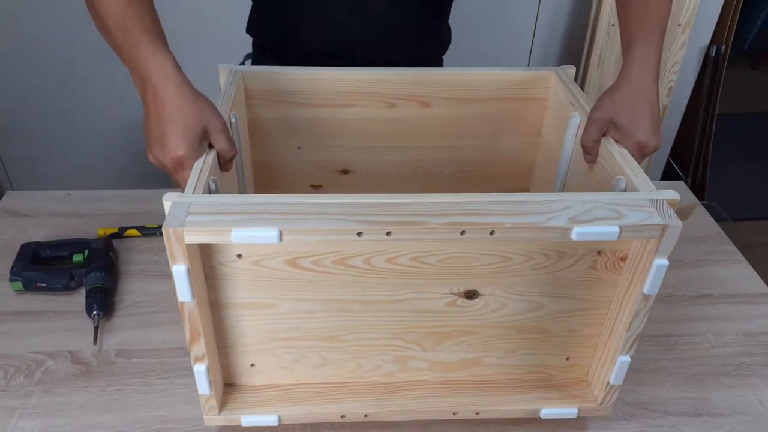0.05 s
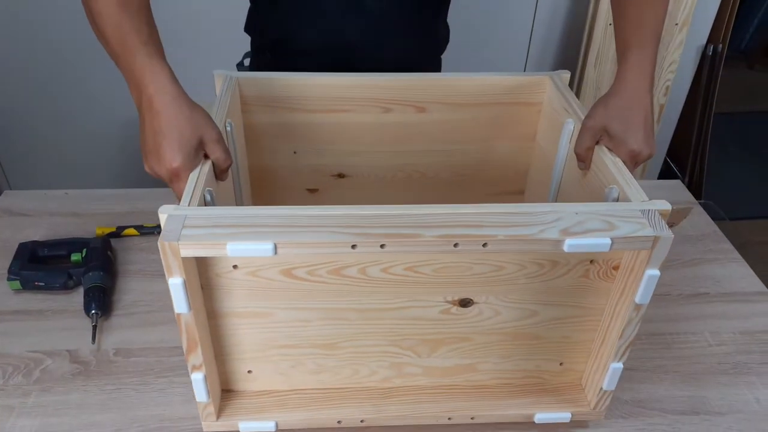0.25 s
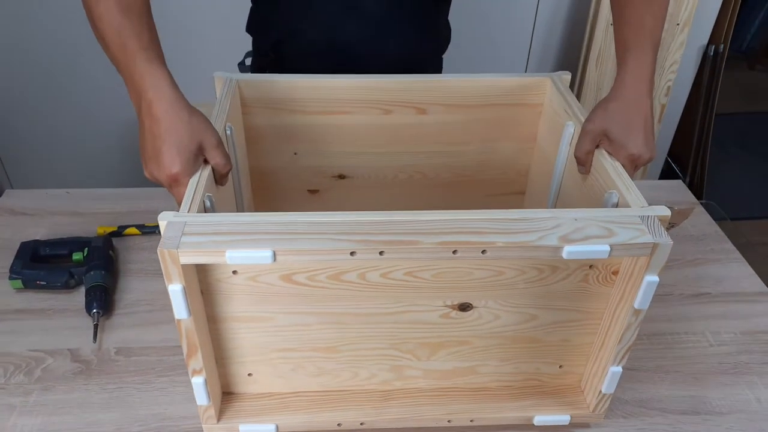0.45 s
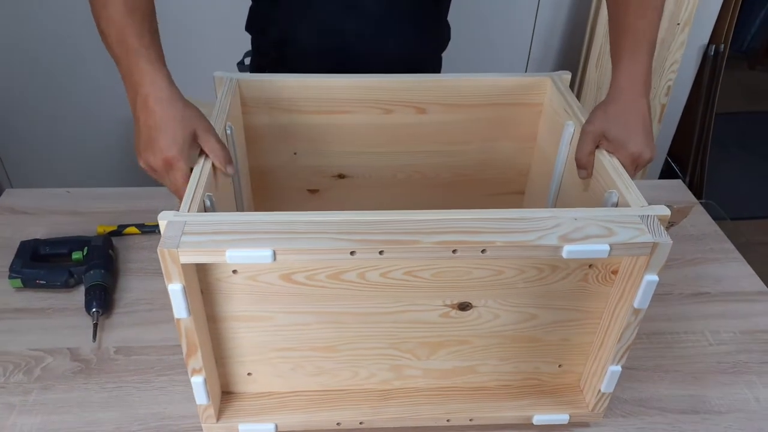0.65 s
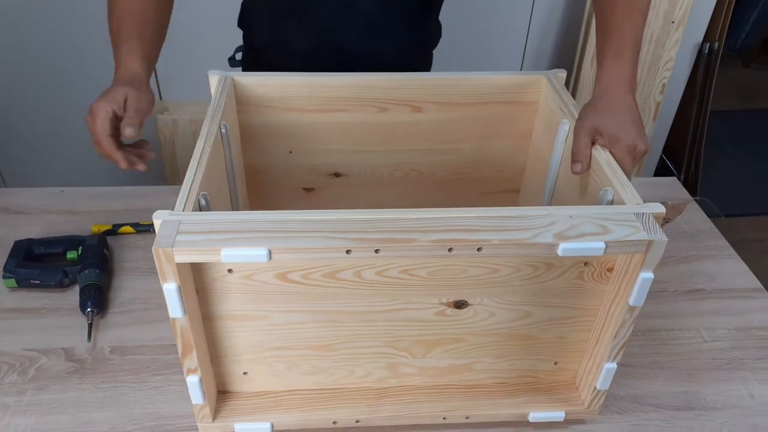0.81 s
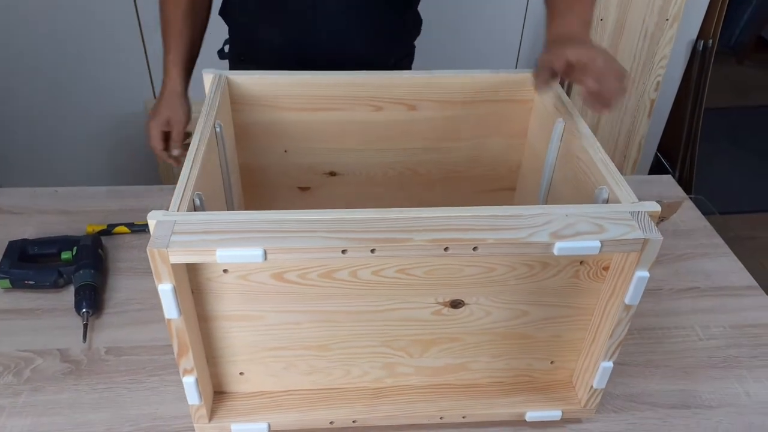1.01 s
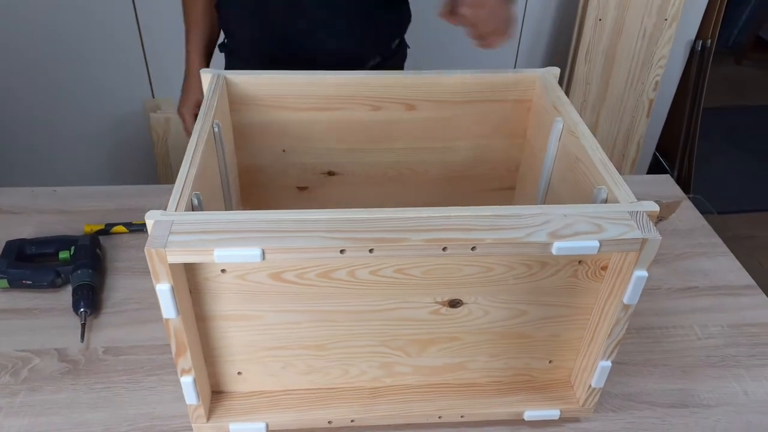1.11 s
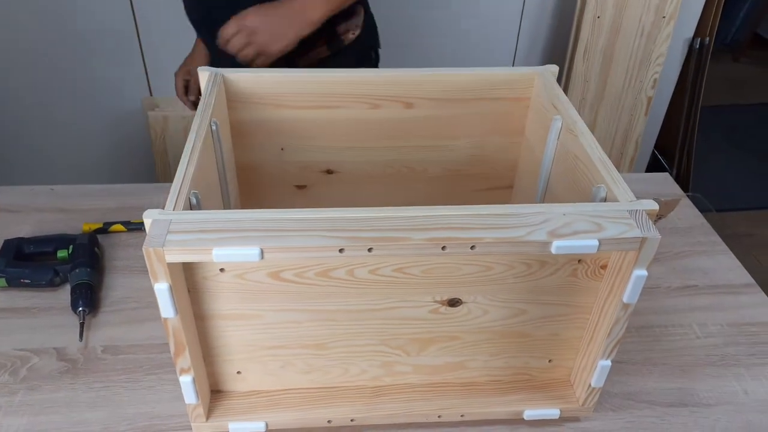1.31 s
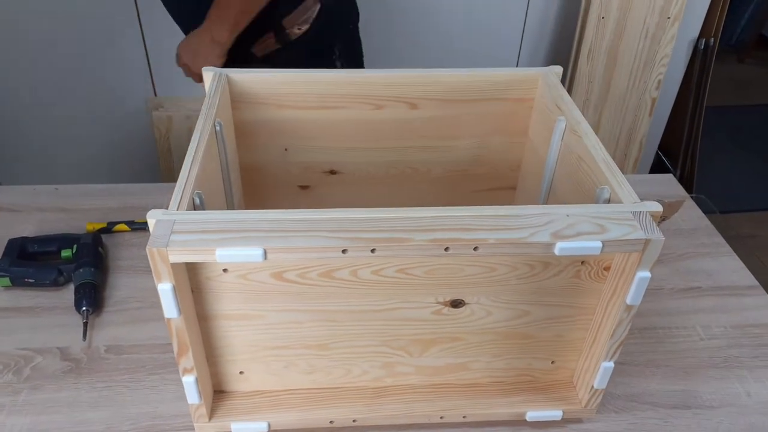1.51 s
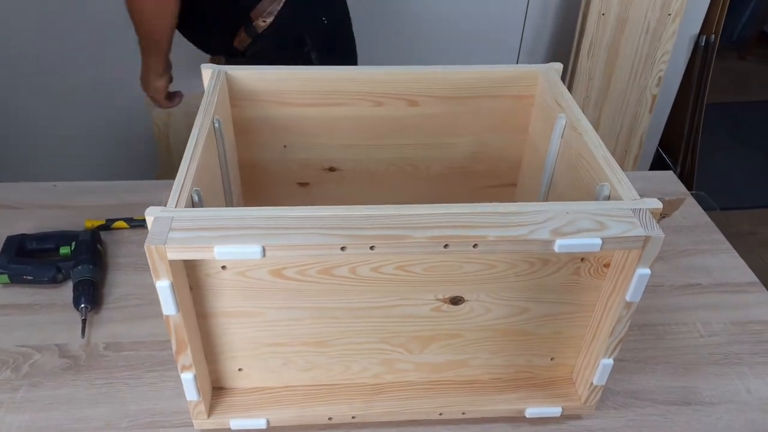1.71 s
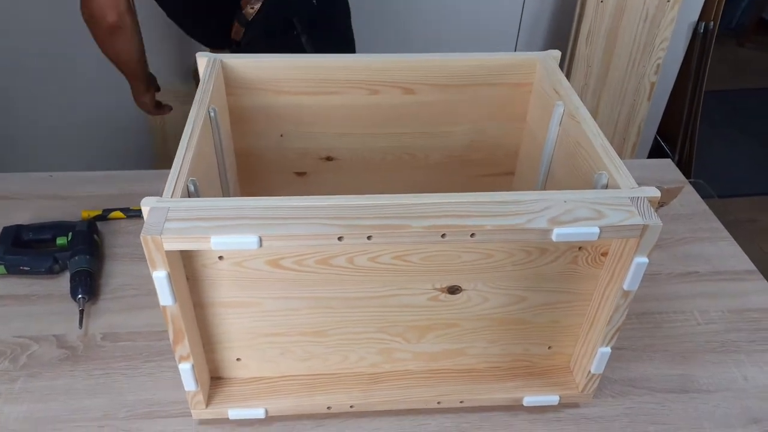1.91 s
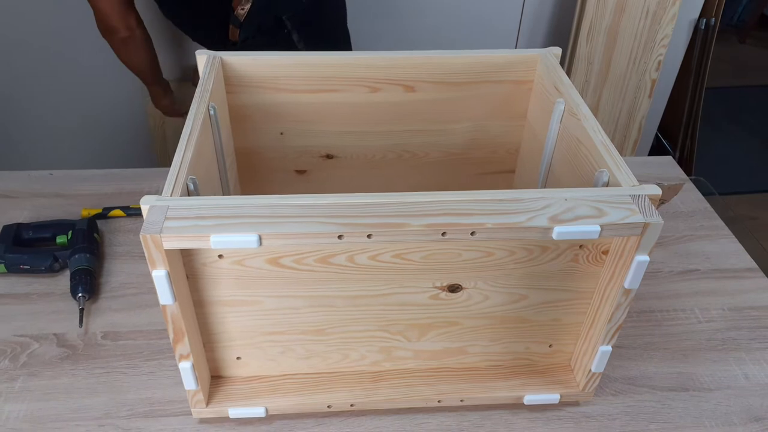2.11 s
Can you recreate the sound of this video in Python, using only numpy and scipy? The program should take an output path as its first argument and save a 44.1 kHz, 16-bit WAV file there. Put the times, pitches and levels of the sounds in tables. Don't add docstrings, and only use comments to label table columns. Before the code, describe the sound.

A hollow wooden box frame is set down on a table: after near silence, a first knock at 0.2 s, then the loudest deep boom near 0.4 s with rapid rocking thuds and dry board rattles, choked by 0.65 s. Hands slide faintly off the wood until 1.1 s; clothes swish around 1.5-1.7 s, and a soft, dull step shakes the floor near 1.85-2 s. Quiet workshop air, close stereo.

```python
import sys
import numpy as np
from scipy import signal
from scipy.fft import rfft, irfft, next_fast_len
from scipy.io import wavfile
from scipy.ndimage import uniform_filter1d

SR = 44100
rng = np.random.default_rng(int(sys.argv[2]) if len(sys.argv) > 2 else 0)


def makeup_ratio(level_db):
    decades = np.asarray(level_db, float) / 20
    return 10 ** decades


def bounce(signal):
    frames = np.transpose(np.atleast_2d(signal))
    limited = np.clip(frames, -1, 1)
    pcm = np.round(limited * 32767).astype(np.int16)
    wavfile.write(sys.argv[1], SR, pcm)


N = 94815

# t/s, boom level/dB, hollow level/dB, knock level/dB, tick level/dB
CONTACTS = [(0.183, -53, -43.5, -74, -75), (0.2, -54.5, -30, -50, -64), (0.217, -18, -11.5, -34, -70),
            (0.241, -49, -38.5, -37.5, -80.5), (0.279, -17, -18.5, -39.5, -71),
            (0.306, -26.5, -24.5, -38.5, -71), (.375, -5.5, -5, -30, -68.5), (.404, -14, -27, -38.5, -64),
            (0.426, -34.5, -30.5, -39.5, -69.5), (.458, -15, -12, -45, -62.5),
            (0.484, -12, -37.5, -40, -62.5), (0.506, -13.5, -26.5, -44, -53),
            (0.534, -32, -21.5, -54.5, -67), (0.572, -42, -43, -49.5, -60),
            (0.608, -29.5, -28.5, -46.5, -49.5), (0.653, -48, -41, -70, -58),
            (0.711, -43, -40.5, -70, -79.5), (.451, -47, -21, -41.5, -60), (.26, -43.5, -36.5, -40, -73)]
# f/Hz, level on edge/dB, level lying flat/dB, t60/s
BOOM_MODES = [(72.4, -32, -33, 0.4), (95, -30, -26, 0.27), (125, -4.5, 0.5, 0.074), (167.6, -0.5, -6, 0.38),
              (205.2, -4.5, -3.5, 0.36)]
# f/Hz, level on edge/dB, level lying flat/dB, t60/s
HOLLOW_MODES = [(250, -7, -21, 0.25), (284.73, -21.5, 0, 0.46), (313.7, -2, -3.5, 0.3),
                (328.7, -1.5, -0.5, 0.2), (383, -13.5, -9, 0.19), (432.7, -27, -24, 0.25)]
# f/Hz, level/dB, t60/s
KNOCK_MODES = [(537.3, 2.5, 0.16), (619, -1.5, 0.067), (682, -0.5, 0.056), (757.6, -4.5, 0.16),
               (847.4, -6, 0.14), (928, -5, .07), (1028, -6.5, 0.07), (1125, -4.5, .06), (1230, -6.5, 0.06),
               (1432, -9.5, 0.06), (1534, -10.5, .06), (1617, -13, .07), (1868, -16.5, 0.12),
               (2186, -19, .04)]
# f/Hz, level/dB
TICK_COLOUR = [(900, -10), (2000, 11), (6500, 0.5), (9000, 0), (15000, -4.5)]
# f/Hz, level/dB
CLATTER_COLOUR = [(900, -4.5), (2200, -1), (4200, -7), (8000, -30.5)]
# t/s, level/dB, f/Hz, t60/s
RATTLES = [(.195, -51.5, 1160, 0.1), (.198, -53, 800, .06), (.205, -60, 2350, 0.069),
           (.219, -39, 1230, 0.066), (.219, -36, 950, 0.052), (.245, -35, 619, 0.18),
           (.278, -49, 1650, .04), (.3, -40.5, 640, 0.21), (.303, -56, 1600, 0.1),
           (.376, -28.5, 1100, 0.03), (.376, -37, 1480, 0.064), (.375, -46, 2100, 0.099),
           (.375, -48, 2450, 0.05), (.375, -47.5, 3500, 0.041), (.401, -33.5, 985, 0.055),
           (.405, -43, 2300, .04), (.42, -41.5, 1200, .04), (.451, -41.5, 1250, 0.035),
           (.452, -48, 2900, .04), (.456, -40, 1400, 0.022), (.478, -44, 3600, 0.024),
           (.484, -39.5, 2086, .025), (.483, -40, 980, 0.061), (.484, -45, 1300, .04),
           (.485, -43.5, 1650, 0.033), (.497, -42, 1000, 0.036), (.53, -42.5, 650, .06),
           (.608, -46.5, 830, 0.073), (.608, -51.5, 1100, 0.057)]
# t/s, length/s, level/dB, f/Hz
THROBS = [(0.599, 0.15, -51, 419.5), (.21, 0.14, -28, 124.8), (.27, 0.073, -34.5, 189.6),
          (.31, 0.075, -29, 323.6), (.372, 0.061, -8.5, 121.1), (.43, 0.045, -18, 287.8),
          (.455, 0.059, -15, 121.6), (.5, 0.08, -21, 172.4), (.515, 0.099, -26.5, 122.6),
          (.54, 0.16, -55, 70.7), (.59, 0.11, -41, 125), (.6, 0.085, -35, 170), (.62, 0.058, -41.5, 304.5),
          (.69, .065, -49, 302), (.705, 0.026, -47, 128), (.745, 0.035, -49, 133), (.76, 0.055, -63, 318)]
# t/s, level/dB
HAND_LEVELS = [
    [(0, -79), (.05, -83), (.08, -106), (.17, -112)],
    [(.175, -77), (.206, -63.5), (.36, -78.5), (.38, -62.5), (.56, -72.5), (.67, -61), (.80, -86),
     (.895, -82), (1.1, -91.5)],
]
# f/Hz, level/dB
SKIN_COLOUR = [(300, 11), (900, 4.5), (2000, 3), (4000, -2), (8000, -10.5), (11000, -13), (15500, -17)]
# t/s, level/dB, sole weight/dB, cloth fold/dB
MOVES = [
    [(1.1, -88, -1.5, -21), (1.206, -80, -5, -29), (1.258, -68, -4, 2), (1.396, -71.5, 2.5, -3.5),
     (1.435, -71.5, -11.5, -5.5)],
    [(1.44, -72.5, -16, 0.5), (1.47, -63.5, -13.5, -9), (1.55, -59.5, -12, 2), (1.64, -54, -29, 1.5),
     (1.75, -67.5, -9.5, 2)],
    [(1.75, -63, -6.5, -5), (1.828, -50.5, -1.5, 6), (1.92, -57, 8.5, 5.5), (2.05, -71.5, 8.5, 1),
     (2.082, -82.5, 0.5, 5.5), (2.15, -82, 10.5, -2)],
]
# f/Hz, level/dB
CLOTH_COLOUR = [(400, 6.5), (800, 10), (1350, -9.5), (2200, 1.5), (3900, 5), (5500, -4.5), (8500, -13),
                (15500, -24)]
# f/Hz, level/dB
SOLE_COLOUR = [(60, -4.5), (130, -0.5), (230, 6), (340, 8.5), (450, 6), (720, -4.5), (1100, -18),
               (2000, -52)]
# f/Hz, level/dB
FOLD_COLOUR = [(400, 4), (600, -6.5), (900, 4.5), (1350, 4), (2200, 3), (5000, -32)]
# t/s, level/dB, f/Hz, t60/s
STEPS_AND_RINGS = [(0, -51.5, 231, 0.16), (.005, -56, 321.7, 0.21), (.1, -51, 290, .2), (.80, -55.5, 143, 0.63),
                   (.915, -53.5, 139, 0.24), (.855, -49.5, 310, 0.16), (.9, -52, 333, 0.27), (.945, -56.5, 320, 0.19),
                   (.985, -59.5, 333, 0.077), (1.37, -52, 330, 0.11), (1.775, -53, 60, 0.17), (1.79, -48, 205, 0.37),
                   (1.845, -33, 460, 0.066), (1.83, -39, 717, 0.19), (1.875, -39, 850, 0.13),
                   (1.875, -38.5, 70.3, 0.37), (1.89, -42, 231.1, 0.35), (1.935, -35, 270, 0.13),
                   (1.936, -33, 125, 0.14), (1.967, -42, 125, 0.19), (1.96, -38, 327.4, 0.22),
                   (2.025, -42.5, 250, 0.16), (2.09, -58, 65.5, 0.35), (2.10, -54.5, 310, 0.21),
                   (2.11, -54.5, 380, .15)]
# t/s, length/s, level/dB, f/Hz, width/Hz
SQUEAKS = [(.74, .1, -75.5, 1590, 119), (0.857, .13, -79.5, 1560, 59.7), (.86, .08, -71.5, 3000, 1994),
           (1.08, .14, -82, 1900, 80), (1.14, 0.35, -73, 3900, 500), (1.785, 0.092, -65, 3560, 3480),
           (1.493, 0.24, -51.5, 1400, 350), (1.613, .12, -62, 532, 120)]
# f/Hz, level/dB
AIR_COLOUR = [(18, -25.5), (50, -11.5), (130, -17.5), (225, -15.5), (292, 9), (606, -14.5), (1910, -19.5),
              (2240, -23.5), (15500, -30)]
# f/Hz, width/Hz, level/dB
HUM = [(141, 40, -80), (255, 60, -78.5), (325, 37, -80.5)]

FLAT_START_S, FLAT_END_S = 0.37, 0.56
CHOKE_START_S, CHOKE_DB_PER_S = 0.575, 170
LOOSE_T60_SHARE = 0.75
SCATTER_DB, DETUNE = 7.5, 0.017
LOW_SCATTER, KNOCK_SCATTER = 0.25, 0.64
PUSH_S, KNOCK_PUSH_S, RATTLE_PUSH_S, STEP_PUSH_S = 0.004, 0.00028, 0.0003, 0.013
KNOCK_SIDE_DB = -6.5
TICK_T60_S = 0.03
CLATTER_DB, CLATTER_T60_S = -24.5, 0.063
GRAINS_PER_S, GRAIN_DB, GRAIN_SHARE = 1500, 3, 0.46
FLICKER_DB, FLICKERS_PER_S = 2.02, 24.87
AIR_DB = -73
WAVER_DB, WAVERS_PER_S = 3, 14
ROOM_T60_S, ROOM_DB, ROOM_THIN_HZ, ROOM_DULL_HZ = 0.3, -11, 350, 3000
ALIKE_HZ = 700
LEFT_DB = 1.5
LEFT_LIFT_HZ, LEFT_LIFT_DB = 1500, 2
RIGHT_LIFT_HZ, RIGHT_LIFT_WIDTH_HZ, RIGHT_LIFT_DB = 8100, 2500, 11
NOTCH_HZ, NOTCH_WIDTH_HZ, NOTCH_DB = 10060, 900, -8
LOW_CUT_HZ, RIGHT_LAG_S = 46, 0.0001


def cabinet():
    wood = single(RATTLES, RATTLE_PUSH_S) + throbs() + np.zeros((2, N))
    choked = np.zeros(N)
    noise_env = np.zeros((2, N))
    t = np.arange(SR // 4) / SR
    chance = rng.standard_normal((40, 3, 2, 14))
    for (s, boom_db, hollow_db, knock_db, tick_db), c in zip(CONTACTS, chance):
        level_column = 2 if FLAT_START_S < s < FLAT_END_S else 1
        loose = s > FLAT_END_S
        t60_share = LOOSE_T60_SHARE if loose else 1
        for modes, db in ((BOOM_MODES, boom_db), (HOLLOW_MODES, hollow_db)):
            posed = np.array(modes)[:, [0, level_column, 3]] * [1, 1, t60_share]
            body = makeup_ratio(db) * ring(posed, LOW_SCATTER * c[0], PUSH_S) / 2
            add(wood if loose else choked, s, body)
        mid = ring(KNOCK_MODES, KNOCK_SCATTER * c[2], KNOCK_PUSH_S)
        side = ring(KNOCK_MODES, KNOCK_SCATTER * c[1], KNOCK_PUSH_S)
        add(wood, s, makeup_ratio(knock_db) * spread(mid, makeup_ratio(KNOCK_SIDE_DB) * side) / 2)
        tick_env_db = tick_db - 60 * t / TICK_T60_S
        clatter_env_db = knock_db + CLATTER_DB - 60 * t / CLATTER_T60_S
        add(noise_env, s, makeup_ratio(np.array([tick_env_db, clatter_env_db])))
    choke = makeup_ratio(-CHOKE_DB_PER_S * np.maximum(np.arange(N) / SR - CHOKE_START_S, 0))
    noises = noise_env[0] * hiss(TICK_COLOUR) + noise_env[1] * hiss(CLATTER_COLOUR)
    return wood + choke * choked, noises


def throbs():
    out = np.zeros(N)
    for s, length, db, hz in THROBS:
        t = np.arange(int(length * SR)) / SR
        swell = np.sin(np.pi * t / length)
        add(out, s, makeup_ratio(db) * swell * np.sin(2 * np.pi * hz * t))
    return out


def single(table, push_s):
    out = np.zeros(N)
    for s, db, hz, t60 in table:
        add(out, s, makeup_ratio(db) * ring([(hz, 0, t60)], np.zeros((2, 1)), push_s))
    return out


def ring(modes, chance, push_s):
    t = np.arange(SR // 2) / SR
    m = np.array(modes, float)[:, :, None]
    hz = m[:, 0] * (1 + DETUNE * chance[0, :len(m), None])
    level = makeup_ratio(m[:, 1] + SCATTER_DB * chance[1, :len(m), None])
    y = level * np.sin(2 * np.pi * hz * t) * makeup_ratio(-60 * t / m[:, 2])
    return y.sum(axis=0) * (1 - np.exp(-t / push_s))


def person():
    moving = np.clip((np.arange(N) / SR - 1.08) / 0.0773, 0, 1)
    cloth = rub(CLOTH_COLOUR)
    soles = makeup_ratio(track(MOVES, 2)) * rub(SOLE_COLOUR)
    folds = makeup_ratio(track(MOVES, 3)) * rub(FOLD_COLOUR)
    shuffle = makeup_ratio(track(MOVES, 1) + 4) * (cloth + soles + folds)
    hands = makeup_ratio(track(HAND_LEVELS, 1) + 7.5) * rub(SKIN_COLOUR)
    return single(STEPS_AND_RINGS, STEP_PUSH_S), (1 - moving) * hands + moving * shuffle


def rub(points):
    hits = rng.random((2, N)) < GRAINS_PER_S / SR
    sizes = makeup_ratio(GRAIN_DB * rng.exponential(size=(2, N)))
    grains = hits * sizes * rng.standard_normal((2, N))
    mix = GRAIN_SHARE * unit(grains) + rng.standard_normal((2, N))
    return unit(colour(spread(*mix), points)) * makeup_ratio(FLICKER_DB * walk(FLICKERS_PER_S))


def squeaks():
    out = np.zeros((2, N))
    for s, length, db, hz, width in SQUEAKS:
        n = int(length * SR)
        noise = spread(*rng.standard_normal((2, SR // 2)))
        band = signal.lfilter(*signal.iirpeak(hz, hz / width, SR), noise)
        add(out, s, makeup_ratio(db) * unit(band)[:, :n] * np.sqrt(np.hanning(n)))
    return out


def room(x):
    t = np.arange(SR // 2) / SR
    onset = np.clip((t - 0.003) / 0.014, 0, 1)
    tail = spread(*rng.standard_normal((2, len(t)))) * makeup_ratio(-60 * t / ROOM_T60_S) * onset
    band = signal.butter(1, [ROOM_THIN_HZ, ROOM_DULL_HZ], "band", fs=SR, output="sos")
    tail = signal.sosfilt(band, tail)
    tail = tail / np.sqrt(np.sum(tail ** 2) / 2)
    return signal.fftconvolve(x, tail, axes=1)[:, :N] * makeup_ratio(ROOM_DB)


def workshop():
    hum = np.zeros(N)
    for hz, width, db in HUM:
        level = makeup_ratio(db + WAVER_DB * walk(WAVERS_PER_S))
        peak = signal.iirpeak(hz, hz / width, SR)
        hum += level * unit(signal.lfilter(*peak, rng.standard_normal(N)))
    return makeup_ratio(AIR_DB) * hiss(AIR_COLOUR) + hum


def hiss(points):
    return unit(colour(spread(*rng.standard_normal((2, N))), points))


def spread(x, other):
    high = signal.butter(2, ALIKE_HZ, "high", fs=SR, output="sos")
    side = signal.sosfilt(high, other)
    return np.array([x + side, x - side])


def colour(x, points):
    p, size = np.array(points, float), next_fast_len(2 * N)
    hz = np.maximum(np.arange(size // 2 + 1) * SR / size, 1)
    gain_db = np.interp(np.log(hz), np.log(p[:, 0]), p[:, 1], left=-60)
    return irfft(rfft(x, size) * makeup_ratio(gain_db), size)[..., :N]


def walk(rate):
    k = int(SR / rate)
    held = np.repeat(rng.standard_normal(N // 50), k)[:N]
    return unit(uniform_filter1d(uniform_filter1d(held, k), k))


def track(tables, col):
    p = np.vstack([np.array(k, float) for k in tables])
    return np.interp(np.arange(N) / SR, p[:, 0], p[:, col])


def unit(x):
    return x / np.sqrt(np.mean(x ** 2))


def add(out, s, x):
    i = int(s * SR)
    out[..., i:i + x.shape[-1]] += x[..., :N - i]


def scene():
    wood, ticks = cabinet()
    steps, rustle = person()
    pan = makeup_ratio(np.array([[LEFT_DB], [-LEFT_DB]]) / 2)
    near = (wood + ticks) * pan + steps
    return near + room(near) + rustle + workshop() + squeaks()


def band_limit(x):
    return signal.sosfilt(signal.butter(12, 15690, fs=SR, output="sos"), x)


def record(dry):
    size = next_fast_len(N)
    hz = np.arange(size // 2 + 1) * SR / size
    notch_db = NOTCH_DB * np.exp(-((hz - NOTCH_HZ) / NOTCH_WIDTH_HZ) ** 2)
    lift_db = LEFT_LIFT_DB * np.exp(-np.log(np.maximum(hz, 1) / LEFT_LIFT_HZ) ** 2)
    right_lift_db = RIGHT_LIFT_DB * np.exp(-((hz - RIGHT_LIFT_HZ) / RIGHT_LIFT_WIDTH_HZ) ** 2)
    tilt_db = (right_lift_db - lift_db) * np.array([[-1], [1]]) / 2
    lag = np.exp(-2j * np.pi * hz * np.array([[0], [RIGHT_LAG_S]]))
    low_cut = 1 / (1 + (LOW_CUT_HZ / np.maximum(hz, 1)) ** 2)
    heard = rfft(dry, size) * makeup_ratio(notch_db + tilt_db) * lag * low_cut
    return band_limit(irfft(heard, size)[:, :N])


dry = scene()
out = record(dry)
bounce(out)
```